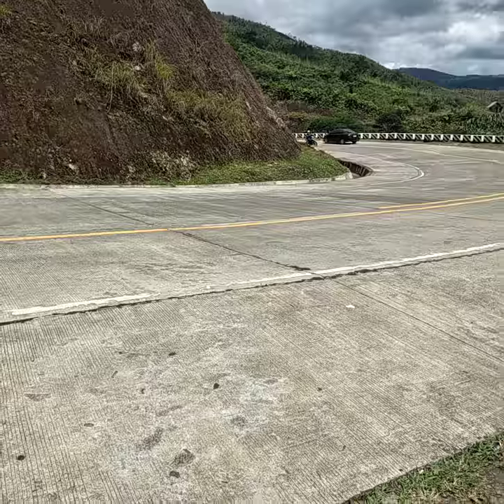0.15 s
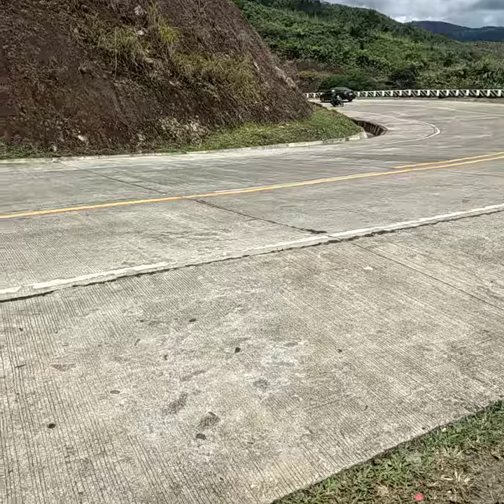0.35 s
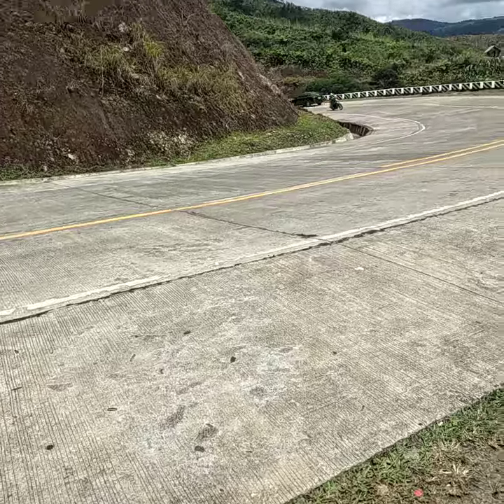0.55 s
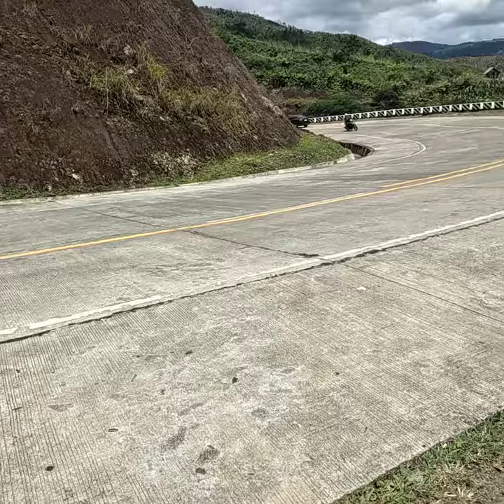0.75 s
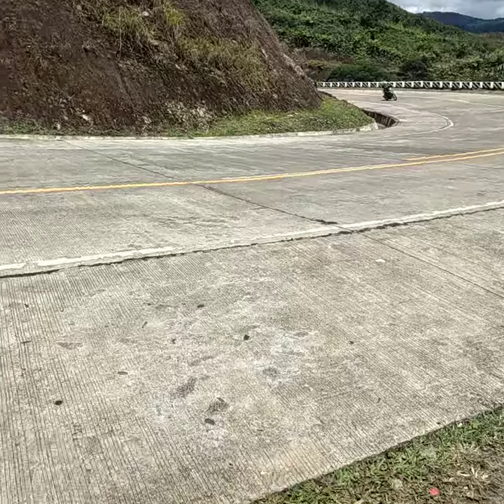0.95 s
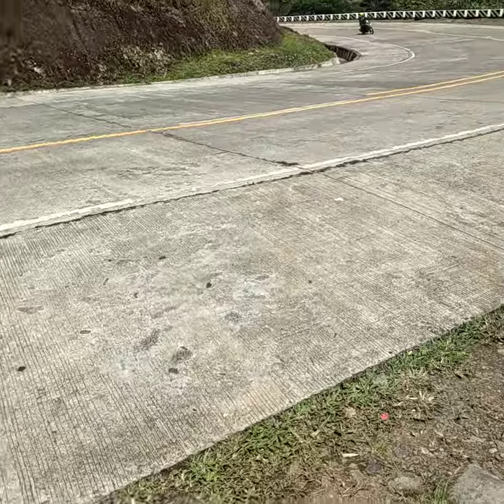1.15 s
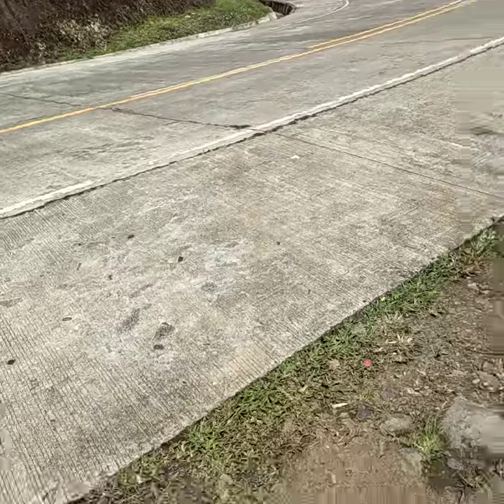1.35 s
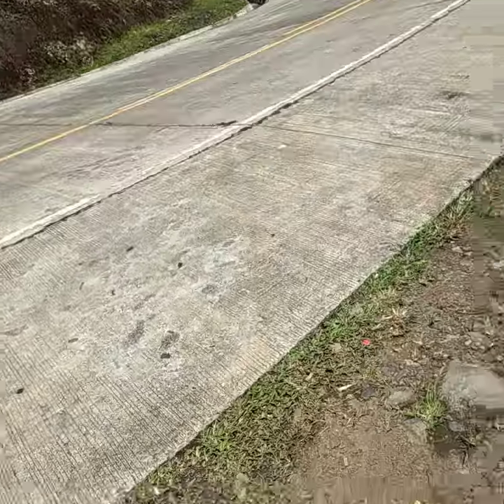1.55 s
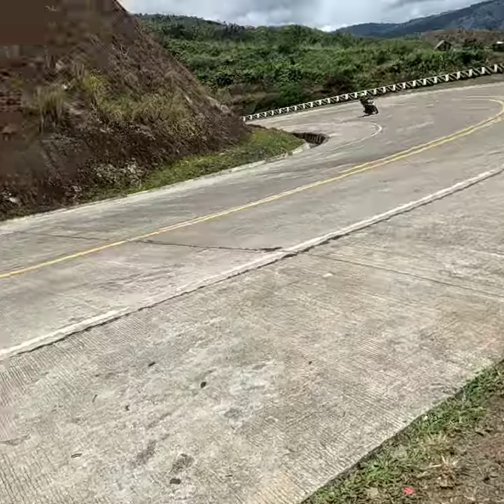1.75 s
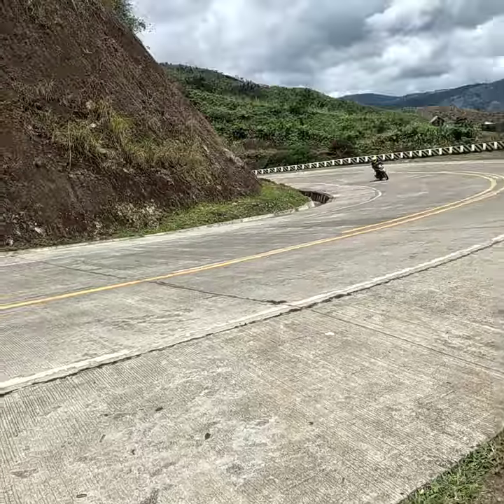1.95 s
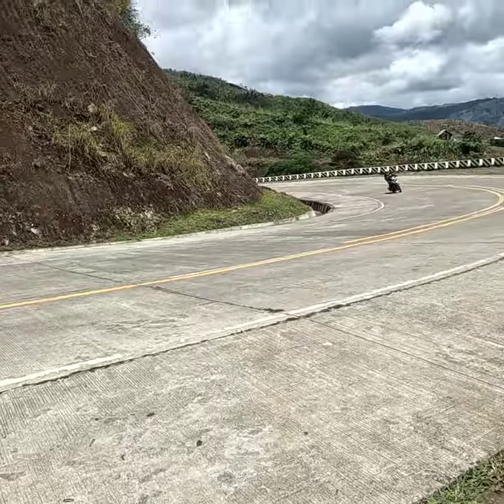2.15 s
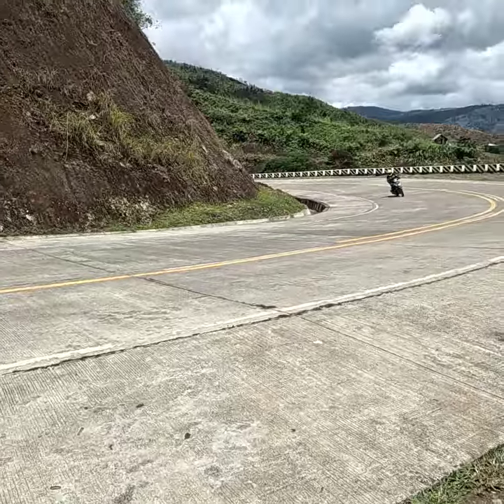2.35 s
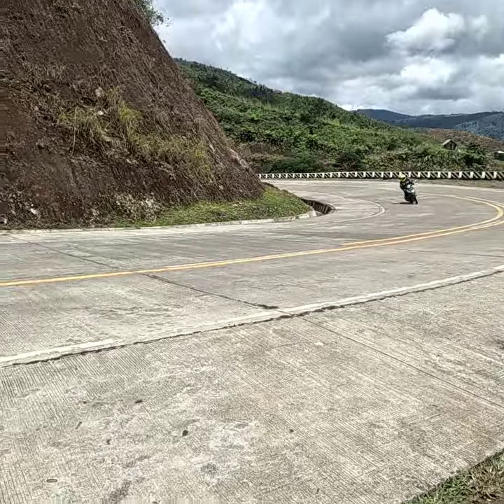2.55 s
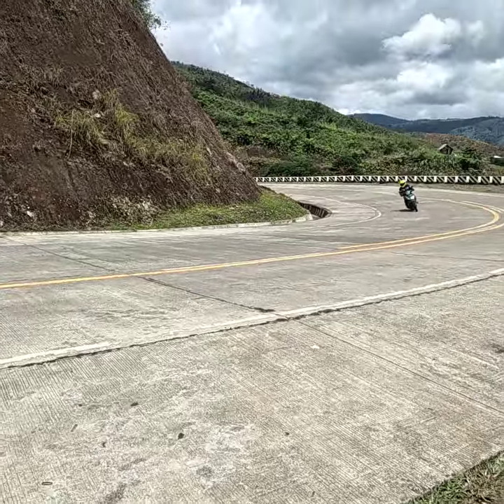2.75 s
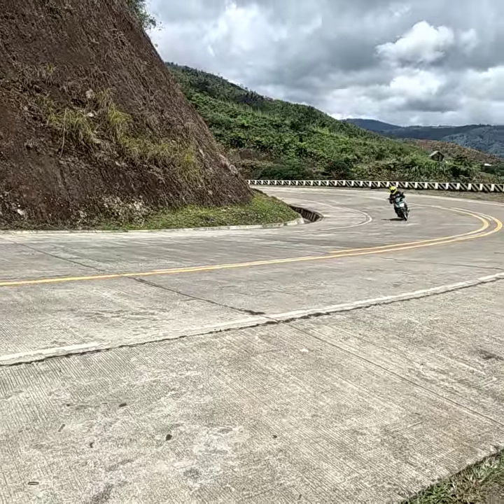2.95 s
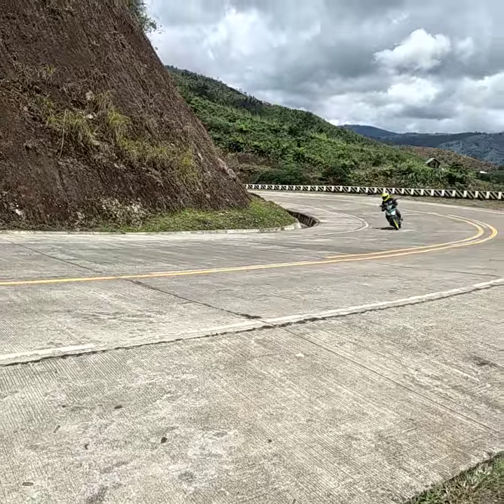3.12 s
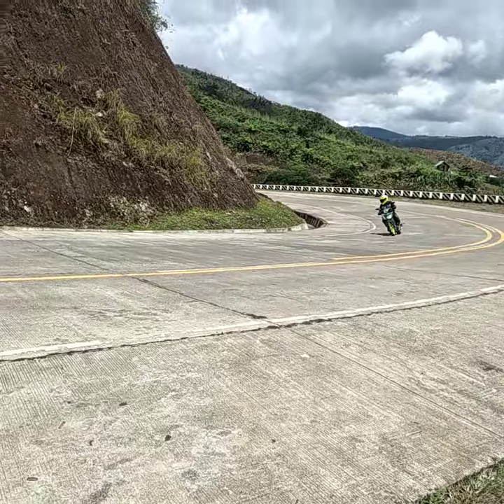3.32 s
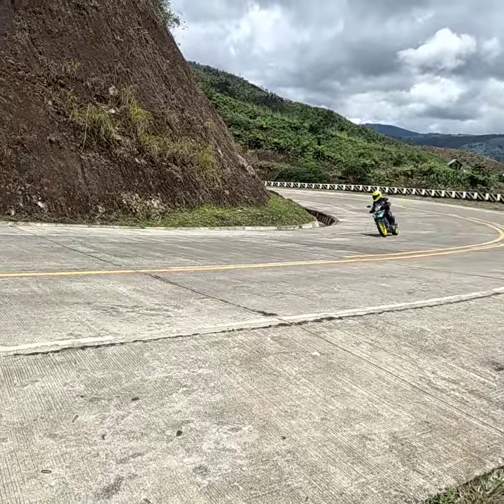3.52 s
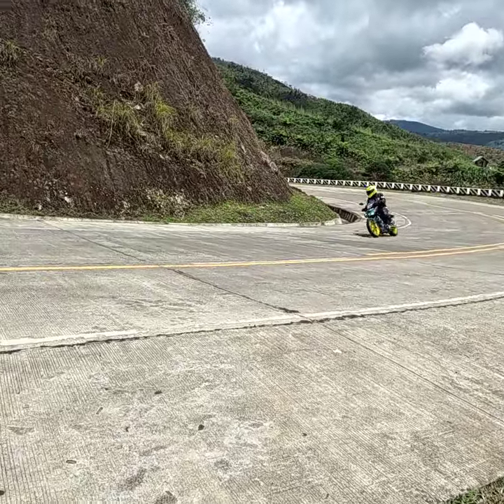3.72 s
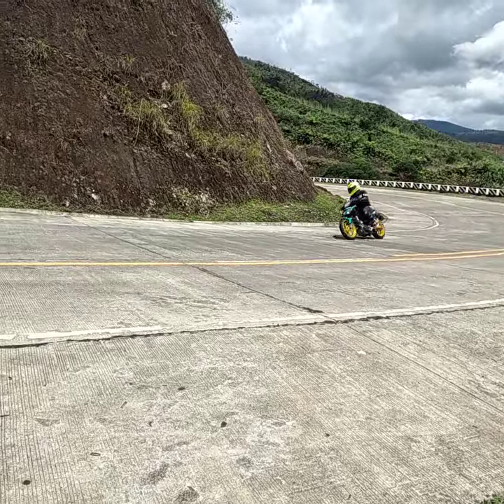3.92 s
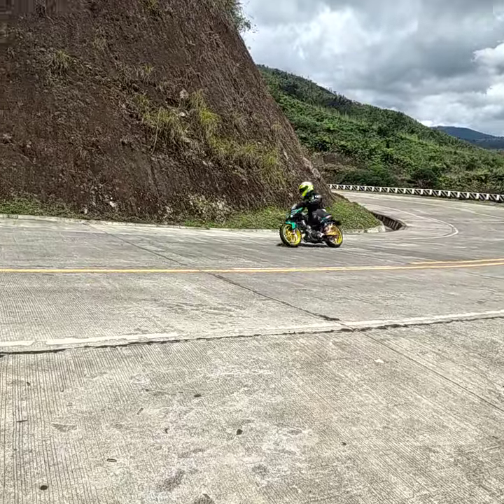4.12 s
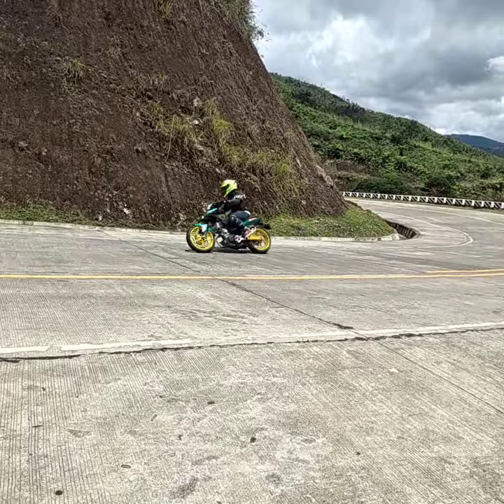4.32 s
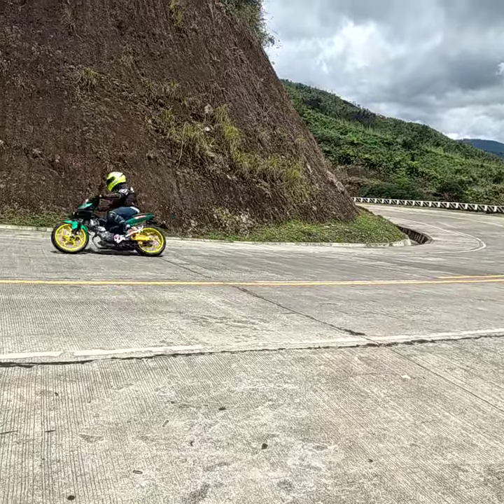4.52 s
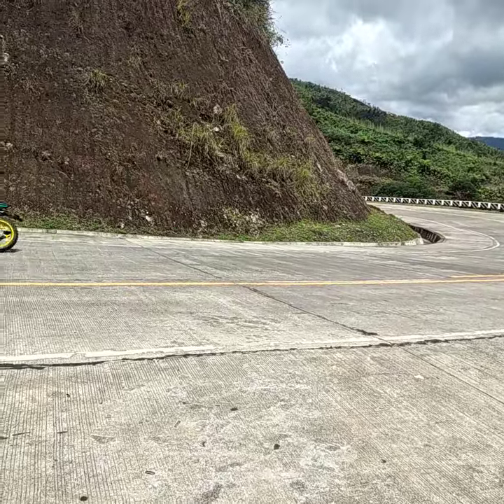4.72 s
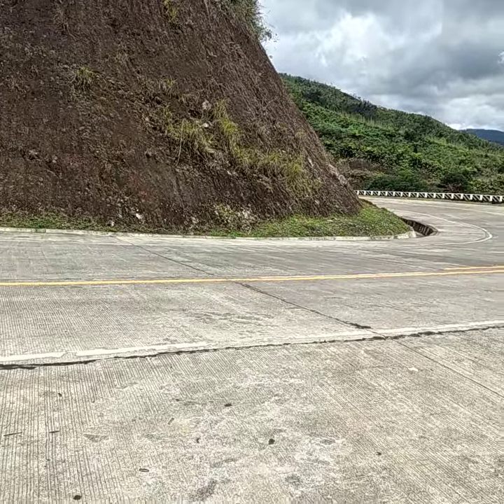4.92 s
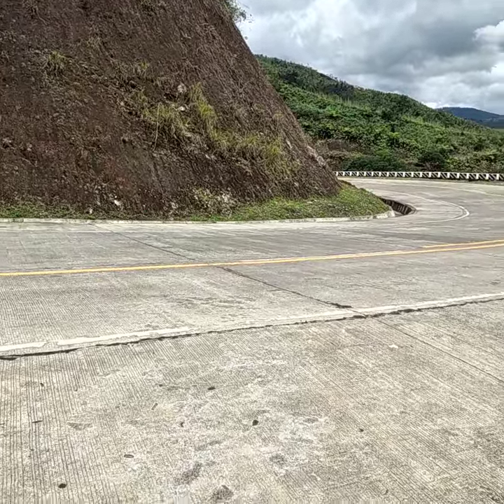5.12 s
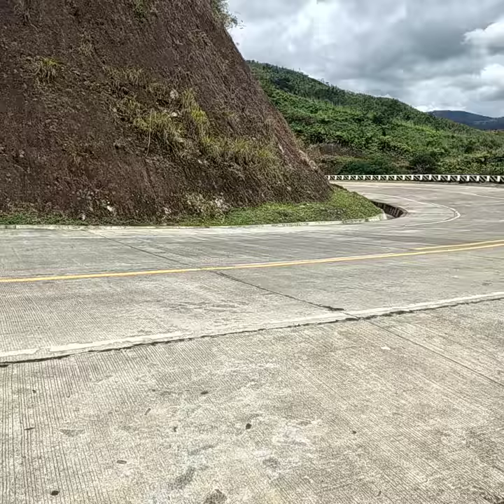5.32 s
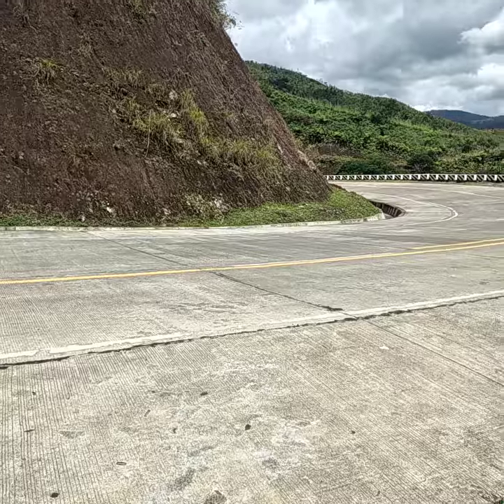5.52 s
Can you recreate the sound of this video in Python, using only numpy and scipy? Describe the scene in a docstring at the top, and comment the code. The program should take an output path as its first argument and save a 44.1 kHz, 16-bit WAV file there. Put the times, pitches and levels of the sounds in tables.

```python
"""A scooter with a cracking tailpipe fades in and pulls away round a hillside bend, its brief whine sinking.
A second one nears and thumps past, a third engine idles with a low, soft throb, and tyres roll on concrete.
Each scooter has one cylinder: every firing puffs gas into the exhaust pipe (a thump), rings the pipe's
tip (a crack) and makes its hiss leap. The hillside echoes the engines, and a microphone with two
openings, or ports, hears it all in stereo."""
import sys
import numpy as np
from scipy import signal
from scipy.fft import rfft, irfft, next_fast_len
from scipy.io import wavfile
from scipy.ndimage import uniform_filter1d

SR = 44100
rng = np.random.default_rng(int(sys.argv[2]) if len(sys.argv) > 2 else 0)


def to_wav(sig):
    """Store sig (one row per channel, or 1-D mono) as 16-bit WAV at the path in sys.argv[1].

    Samples outside -1..1 are clipped; the rate is SR.
    """
    pcm = np.clip(np.atleast_2d(sig), -1, 1) * 32767
    pcm = np.round(pcm).astype(np.int16)
    wavfile.write(sys.argv[1], SR, pcm.T)  # frames by channels


N = 245637
TIME = np.arange(N) / SR
START_S = 0.35  # silence until here
LAG_S = 0.000078  # the left port hears this much later


def gain_of(db):
    """Turns decibels into a number to multiply by."""
    return 10 ** (np.asarray(db) / 20)


def evened(x):
    """Scales a sound to an average strength (rms) of 1."""
    return x / np.sqrt(np.mean(x ** 2) + 1e-20)


def at_pitch(table, hz):
    """Looks up a table by frequency, on a log scale."""
    f, value = np.transpose(table)
    return np.interp(np.log(hz + 1), np.log(f + 1), value)


def curves(table):
    """Turns each column after the time into a curve."""
    times, *columns = np.transpose(table)
    return [np.interp(TIME, times, column) for column in columns]


def ramp(start_s, end_s):
    """Rises from 0 to 1 between two times."""
    return np.clip((TIME - start_s) / (end_s - start_s), 0, 1)


def firings(rate, head_start, jitter_s):
    """The samples where an engine fires: once a cycle, a little early or late. head_start is in cycles."""
    cycles = head_start + np.cumsum(curves(rate)[0] * (TIME > START_S)) / SR
    at = np.flatnonzero(np.diff(np.floor(cycles)))
    jitter = (jitter_s * SR * rng.standard_normal(len(at))).astype(int)
    return np.clip(at + jitter, 0, N - 1)


def clicks(at, spread_db):
    """One click per firing, each of its own strength."""
    x = np.zeros(N)
    x[at] = gain_of(spread_db * rng.standard_normal(len(at)))
    return x


def trail(x, decay_s):
    """Gives every click a fading tail."""
    return signal.lfilter([1], [1, -np.exp(-1 / (decay_s * SR))], x)


def thump(kicks, pipe, puff_s):
    """A smooth puff of gas at each firing makes the exhaust pipe ring."""
    puffs = signal.oaconvolve(kicks, signal.windows.gaussian(401, puff_s * SR), "same")
    t = np.arange(SR // 8) / SR
    ring = sum(gain_of(db - 60 * t / t60) * np.cos(2 * np.pi * hz * t) for hz, db, t60 in pipe)
    swing_back = np.exp(-t / 0.0012)
    ring -= ring.sum() * swing_back / swing_back.sum()  # the pressure averages out to zero
    return evened(signal.oaconvolve(puffs, ring)[:N])


def crack(at, tip, roughness, spread_db):
    """A gas front, trailed by swirling gas, rings the pipe's tip; each firing favours other tones."""
    t, out = np.arange(2000) / SR, np.zeros(N)
    strength = clicks(at, spread_db=0.9)
    swirl = trail(strength, 0.0018) * rng.standard_normal(N)
    attack = 1 - np.exp(-t / 0.00056)
    for hz, db, t60 in tip:
        front = evened(strength * clicks(at, spread_db)) + roughness * evened(swirl)
        ring = gain_of(db - 60 * t / t60) * attack * np.sin(2 * np.pi * hz * t)
        out -= signal.oaconvolve(front, ring)[:N]
    return evened(out)


# How alike the noise is on the left and right: f/Hz, likeness/0-1
LIKENESS = [(30, .88), (80, .93), (150, .99), (300, .98), (450, .8), (1200, .8), (2000, .75), (3300, .5),
            (5500, .6), (8000, .4), (12000, .2)]


def stereo_noise(left_db, right_db, patchy_db, size):
    """Noise with its own tone colour on each side, louder and softer in drifting patches."""
    hz = np.fft.rfftfreq(size, 1 / SR)[:, None]
    a, b, c, d, patches = rng.standard_normal((N // (size // 4) + 5, size // 2 + 1, 5)).T
    patches = uniform_filter1d(patches, size // 100, 0)  # smooth across pitch
    patches = evened(uniform_filter1d(patches, 36000 // size, 1))  # and across time
    alike = at_pitch(LIKENESS, hz)
    left = a + 1j * b
    right = alike * np.exp(2j * np.pi * hz * LAG_S) * left + np.sqrt(1 - alike ** 2) * (c + 1j * d)
    spectra = np.array([left, right]) * gain_of(np.array([left_db, right_db]) + patchy_db * patches)
    x = signal.istft(spectra, nperseg=size, noverlap=size * 3 // 4)[1][:, :N]
    return x / np.sqrt(np.mean(x.mean(0) ** 2))


# Tone colour of the hiss at each port: f/Hz, relative level/dB
HISS_LEFT = [(1500, -6.5), (2300, -16.5), (2900, -1.5), (3600, -9.5), (4500, -10), (5400, -7.5), (6500, 0),
             (7500, 5), (8800, -5), (10500, -22), (13000, -20.5), (15800, -25)]
HISS_RIGHT = [(2000, -5), (3200, -12.5), (4200, -9), (6000, -4), (8000, -7), (10000, 0.5), (12000, -8),
              (14000, -12.5), (15800, -14)]


def hiss(level_db, lift_db, nearest_s, spacing_hz, widen_hz_per_s, bounce):
    """Chain, valves and air hiss. Distance dulls the sound, and its echo off the road cuts notches in it."""
    hz = np.fft.rfftfreq(256, 1 / SR)[:, None]
    frames = np.minimum(np.arange(N // 64 + 5) * 64, N - 1)
    notch_gap_hz = spacing_hz + widen_hz_per_s * abs(TIME[frames] - nearest_s)  # wider when far away
    # The grooved road scatters the echo above 10700 Hz.
    echo = bounce * np.exp(-(hz / 10700) ** 2 - 2j * np.pi * hz / notch_gap_hz)
    dulling_db_per_khz = 0.0334 * (-30.5 - level_db[frames])  # below -30.5 dB, fainter means duller
    path_db = 20 * np.log10(abs(1 + echo)) - dulling_db_per_khz * (hz / 1000 - 8)
    left_lift_db = lift_db[frames] * np.exp(-((hz - 7200) / 1480) ** 2)
    left_db = at_pitch(HISS_LEFT, hz) + path_db + left_lift_db
    right_db = at_pitch(HISS_RIGHT, hz) + path_db
    return stereo_noise(left_db, right_db, patchy_db=2.2, size=256)


def scooter(at, levels, drift, sides, echo, puff_s, crack_delay_s, roughness, spread_db, leap, leap_s):
    """Each firing gives a thump, then a crack and a leap of hiss. Returns the exhaust and the stereo hiss."""
    crack_db, thump_db, hiss_db = curves(levels)
    pan_db, lift_db = curves(drift)
    later = np.minimum(at + round(crack_delay_s * SR), N - 1)
    kicks = clicks(at, spread_db=0.74)
    thumps = sum(share * thump(kicks, pipe, puff_s) for share, pipe, _ in sides)
    cracks = sum(share * crack(later, tip, roughness, spread_db) for share, _, tip in sides)
    exhaust = gain_of(crack_db) * cracks + gain_of(thump_db) * thumps
    bursts = uniform_filter1d(trail(clicks(later, spread_db=3.66), leap_s), 60)
    hiss_gain = evened(1 + leap * bursts) * gain_of(hiss_db + np.array([pan_db, -pan_db]) / 2)
    return exhaust, hiss_gain * hiss(hiss_db, lift_db, **echo)


# How fast the first scooter fires: t/s, f/Hz
LEAVING_RATE = [(.35, 40.65), (.9, 40.23), (1.3, 40.44), (1.7, 40.58), (2.1, 41.31), (2.7, 41.4),
                (3.2, 42.13), (3.8, 42.51)]
# How loud it is: t/s, crack level/dB, thump level/dB, hiss level/dB
LEAVING_LEVELS = [(.6, -39.5, -28.5, -40), (.8, -36.5, -31, -40.5), (1.02, -34, -32.5, -40.5),
                  (1.3, -34.5, -34.5, -41.5), (1.55, -36, -35, -44), (1.75, -34, -36, -44),
                  (2, -41.5, -35.5, -45), (2.3, -37, -38, -51.5), (2.65, -38.5, -37, -46.5),
                  (3.05, -41, -39, -57), (3.45, -41, -38, -53), (3.75, -48, -42, -56.5),
                  (4.3, -77, -46, -53)]
# Where its hiss sits: t/s, left over right/dB, lift near 7 kHz on the left/dB
LEAVING_DRIFT = [(.7, 4.5, -4), (1.3, 3.5, -1), (3.3, 2.5, 4)]
# Tones of its pipe, and of its tip before and after the bend: f/Hz, relative level/dB, time to fade 60 dB/s
LEAVING_PIPE = [(81, -6, 0.069), (174.2, 3.5, 0.077), (232, -2.5, 0.023), (334, -1, 0.053),
                (720, 7.5, 0.0059)]
LEAVING_TIP = [(497, -23, 0.023), (788, -8.5, 0.023), (1263, -2.5, 0.014), (1550, 8.5, 0.0067),
               (1826, 9, 0.013), (2010, 2.5, 0.011), (2280, -2, 0.018), (4000, -15, 0.014)]
TURNED_TIP = [(702, -13, 0.028), (1545, -3.5, 0.0091), (1802, 8.5, 0.0091), (2028, 3.5, 0.012),
              (2330, -11.5, 0.038), (4180, -11, 0.009)]


def leaving_scooter():
    """The first scooter pulls away; its crack changes tone as it swings round the rock cut."""
    turned = ramp(1.86, 1.88)
    sides = [(1 - turned, LEAVING_PIPE, LEAVING_TIP), (turned, LEAVING_PIPE, TURNED_TIP)]
    echo = dict(nearest_s=0.37, spacing_hz=2080, widen_hz_per_s=1460, bounce=0.43)
    at = firings(LEAVING_RATE, head_start=0.736, jitter_s=0.00007)
    return scooter(at, LEAVING_LEVELS, LEAVING_DRIFT, sides, echo, puff_s=0.00038, crack_delay_s=0.0011,
                   roughness=0.3, spread_db=2.23, leap=3.8, leap_s=0.0024)


# The sinking whine: t/s, base f/Hz, relative level/dB at twice the base, the same at three times
WHINE = [(.35, 578, -33, -39), (.41, 547, -39, -54), (.46, 452, -37, -39), (.52, 358, -50, -44),
         (.56, 330, -62, -52)]


def whine():
    """Two thin tones sink as the first scooter draws away, mostly on the right."""
    hz, second_db, third_db = curves(WHINE)
    on = uniform_filter1d(1. * (TIME > WHINE[0][0]) * (TIME < WHINE[-1][0]), 600)
    phase = 2 * np.pi * np.cumsum(hz) / SR
    tones = gain_of(second_db) * np.sin(2 * phase) + gain_of(third_db) * np.sin(3 * phase)
    return on * tones * gain_of([[-6], [3]])


# How fast the second scooter fires: t/s, f/Hz
NEARING_RATE = [(.35, 45.44), (1, 45.64), (1.5, 45.43), (1.9, 44.82), (2.3, 43.36), (2.7, 43.13),
                (3.1, 43.26), (3.4, 44.06), (3.7, 44.76), (4, 46.04), (4.3, 46.41), (4.6, 47.02),
                (4.9, 47.23), (5.2, 47.84), (5.57, 48.6)]
# How loud it is: t/s, crack level/dB, thump level/dB, hiss level/dB
NEARING_LEVELS = [(.6, -58, -36.5, -49), (2.3, -57, -40.5, -51), (3, -52, -37, -52),
                  (3.4, -45.5, -32.5, -47.5), (3.8, -45.5, -30, -44), (4.1, -41, -28.5, -36),
                  (4.6, -41, -25.5, -32.5), (4.85, -37, -22.5, -31.5), (5.1, -36.5, -23, -35),
                  (5.35, -37, -23.5, -34.5), (5.57, -36, -24.5, -37.5)]
# Where its hiss sits: t/s, left over right/dB, lift near 7 kHz on the left/dB
NEARING_DRIFT = [(2.6, -2, -3), (3.3, 0.5, -3), (3.8, 4, -11.5), (4.75, 3.5, -15), (4.95, 1.5, -2.5),
                 (5.15, 4.5, -1), (5.4, 5.5, 4.5), (5.57, 6.5, 2.5)]
# Tones of its pipe and tip, coming and then going: f/Hz, relative level/dB, time to fade 60 dB/s
NEARING_PIPE = [(102.6, -0.5, 0.045), (183, 0, 0.026), (278.4, -2.5, 0.031), (365, 0, 0.024),
                (857, 15, 0.015)]
NEARING_TIP = [(631, -6, 0.044), (810, -2, 0.02), (1450, -14, 0.012), (3000, -13, 0.012)]
PASSED_PIPE = [(97, -7, 0.042), (162, 3.5, 0.047), (283, 8.5, 0.017), (383, -9.5, 0.063), (976, 5, 0.011)]
PASSED_TIP = [(804, 4, 0.014), (975, 5.5, 0.012), (1225, 1.5, 0.015), (1930, 3, 0.0093),
              (2580, -1.5, 0.018)]


def nearing_scooter():
    """The second scooter thumps past; its tone changes as it turns its tail to the microphone."""
    passed = ramp(4.38, 5.06)
    sides = [(1 - passed, NEARING_PIPE, NEARING_TIP), (passed, PASSED_PIPE, PASSED_TIP)]
    echo = dict(nearest_s=4.52, spacing_hz=2248, widen_hz_per_s=100, bounce=0.3)
    at = firings(NEARING_RATE, head_start=0.192, jitter_s=0.00007)
    return scooter(at, NEARING_LEVELS, NEARING_DRIFT, sides, echo, puff_s=0.0004, crack_delay_s=0.00057,
                   roughness=0.19, spread_db=1.4, leap=0.58, leap_s=0.012)


# How fast the idling engine fires: t/s, f/Hz
IDLING_RATE = [(.35, 14.2), (1.5, 14.06), (2.5, 13.96), (3.5, 13.95), (4.5, 13.83), (5.57, 14.03)]
# Tones of its pipe: f/Hz, relative level/dB, time to fade 60 dB/s
IDLING_PIPE = [(27.7, -5, 0.13), (58.8, 9, 0.09), (69, -32, 0.13), (105, -1.5, 0.39), (115.5, 4, 0.21),
               (147, -42, 0.041)]


def idling_engine():
    """Slow, soft puffs ring a deep exhaust pipe."""
    at = firings(IDLING_RATE, head_start=0.43, jitter_s=0.0004)
    return -gain_of(-38) * thump(clicks(at, spread_db=0.8), IDLING_PIPE, puff_s=0.0014)


# How loud the tyres and hillside air are: t/s, level/dB
TYRE_LEVELS = [(.6, -43), (1.9, -43.5), (2.5, -47), (3.2, -44), (5, -39), (5.57, -39.5)]
# Their tone colour: f/Hz, relative level/dB
TYRE_COLOUR = [(25, -6), (60, -9), (170, -8), (300, -10), (480, -16), (700, -13), (1000, -15), (1750, -16),
               (3000, -21), (6000, -35), (12000, -55)]


def tyres():
    """Tyres on grooved concrete and the hillside air make a wide rush under the engines."""
    hz = np.fft.rfftfreq(1024, 1 / SR)[:, None]
    colour_db, tilt_db = at_pitch(TYRE_COLOUR, hz), at_pitch(PORT_BALANCE, hz) / 2
    rush = stereo_noise(colour_db + tilt_db, colour_db - tilt_db, patchy_db=0.68, size=1024)
    return gain_of(curves(TYRE_LEVELS)[0]) * rush


# Which port hears each pitch louder: f/Hz, left over right/dB
PORT_BALANCE = [(160, 0), (270, .8), (450, 2), (740, -2), (1220, 2), (2000, 4), (3300, 6), (5500, 4.5),
                (9000, 2), (15000, -6)]


def ports(x):
    """Direct sound reaches the two ports with a balance that depends on pitch, the left a little late."""
    size = next_fast_len(N)
    hz = np.fft.rfftfreq(size, 1 / SR)
    left = gain_of(at_pitch(PORT_BALANCE, hz) / 2) * np.exp(-1j * np.pi * hz * LAG_S)
    return irfft(rfft(x, size) * np.array([left, 1 / left]), size)[:, :N]


def hillside(x, fade_s):
    """Scattered echoes from the road and rock cut, different on each side and without bass."""
    length = SR // 4
    echoes = np.zeros((2, length))
    at = np.arange(60, length - 20, 20) + rng.integers(0, 20, (2, (length - 61) // 20))
    np.put_along_axis(echoes, at, rng.choice([-1., 1.], at.shape), 1)
    echoes *= gain_of(-60 * np.arange(length) / SR / fade_s)
    echoes = signal.lfilter(*signal.butter(3, 450, "high", fs=SR), echoes / np.linalg.norm(echoes[0]))
    return signal.oaconvolve(x[None], echoes, axes=1)[:, :N]


def scene():
    """Mixes the three exhausts and their echoes with the hiss, whine and tyres, in stereo."""
    leaving, leaving_hiss = leaving_scooter()
    nearing, nearing_hiss = nearing_scooter()
    exhausts = leaving + nearing + idling_engine()
    echoes = gain_of(-8.5) * hillside(exhausts, fade_s=0.21)
    return ports(exhausts) + echoes + leaving_hiss + nearing_hiss + whine() + tyres()


def record(dry):
    """Fades the sound in from silence and cuts the treble above 15800 Hz."""
    faded = dry * ramp(START_S, 0.67) ** 0.99
    treble_cut = signal.firwin(511, 15800, window=("kaiser", 9), fs=SR)
    return signal.oaconvolve(faded, treble_cut[None], "same")


dry = scene()
out = record(dry)
to_wav(out)
```